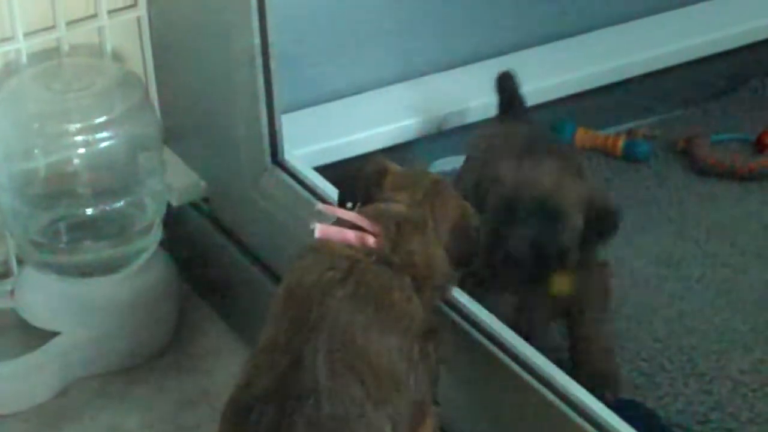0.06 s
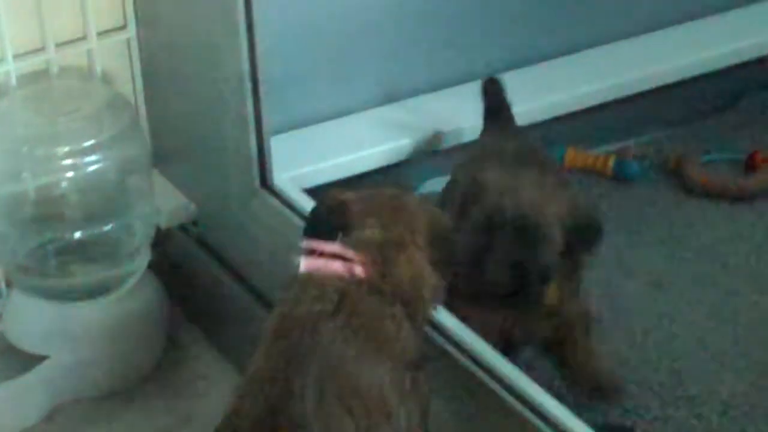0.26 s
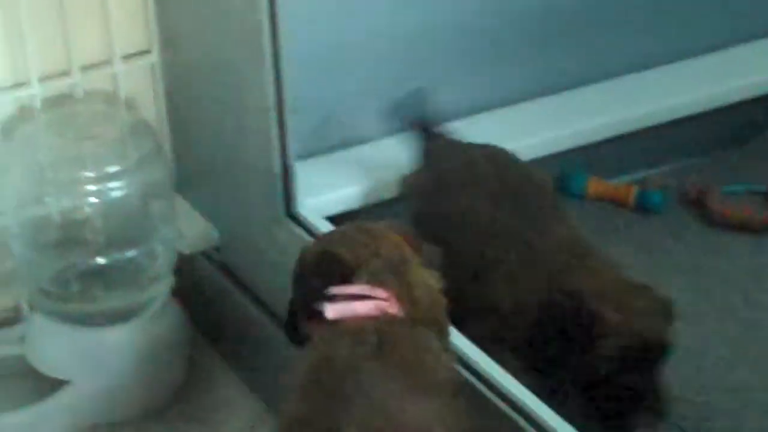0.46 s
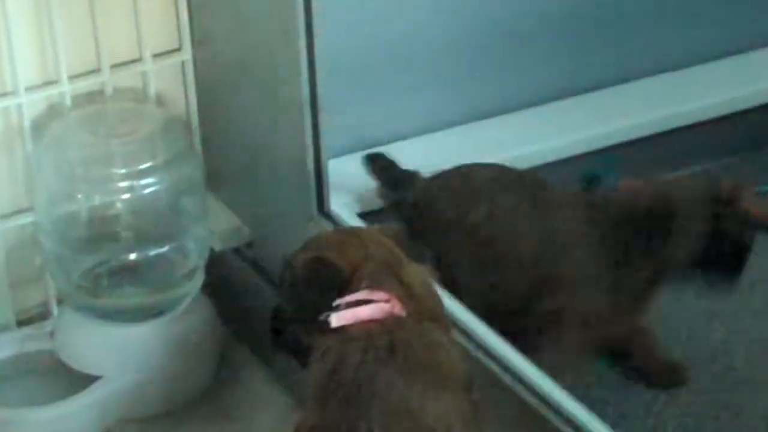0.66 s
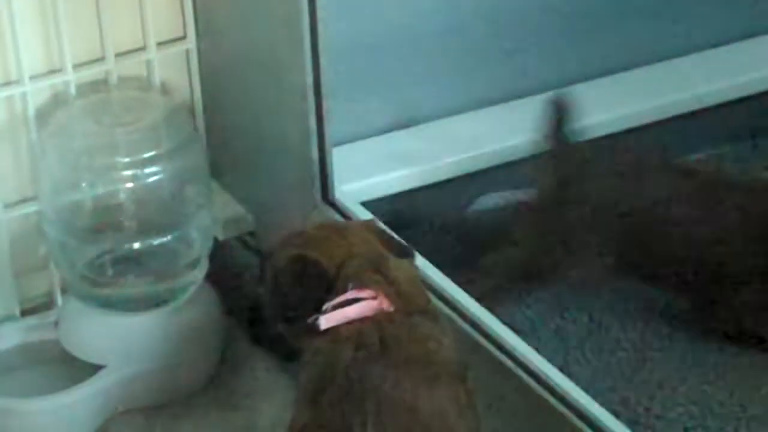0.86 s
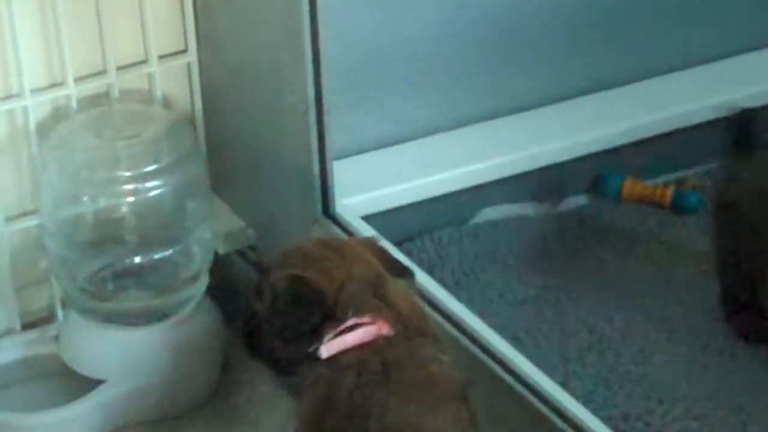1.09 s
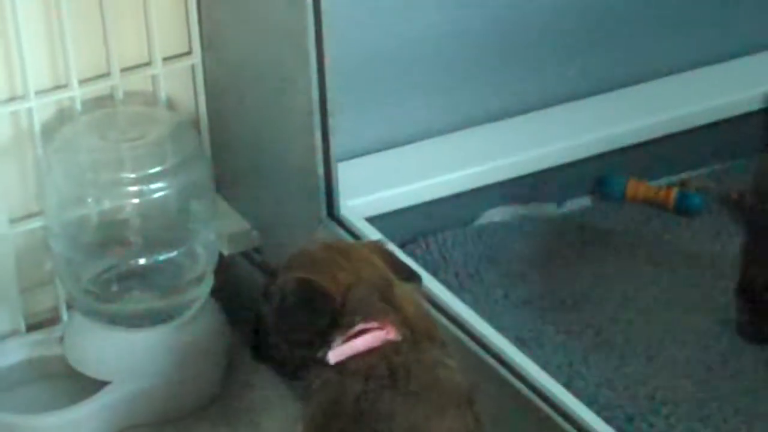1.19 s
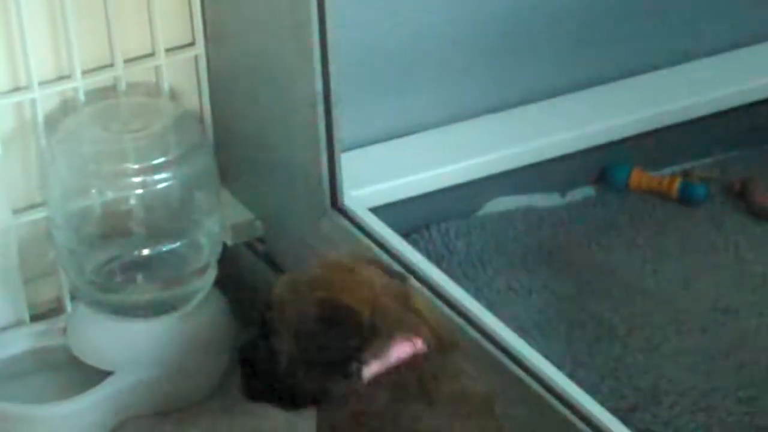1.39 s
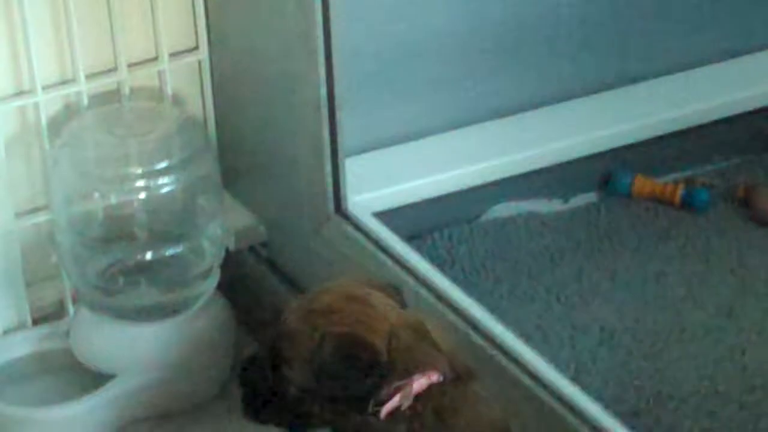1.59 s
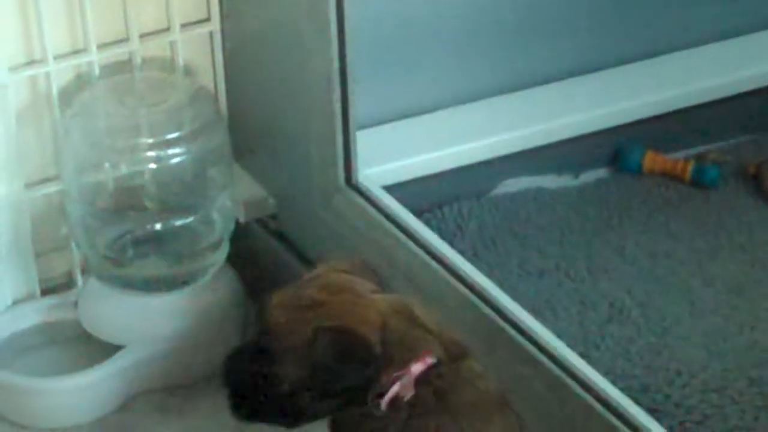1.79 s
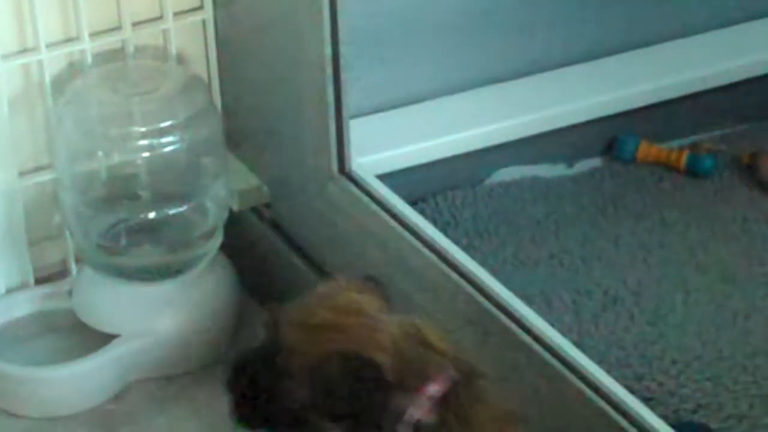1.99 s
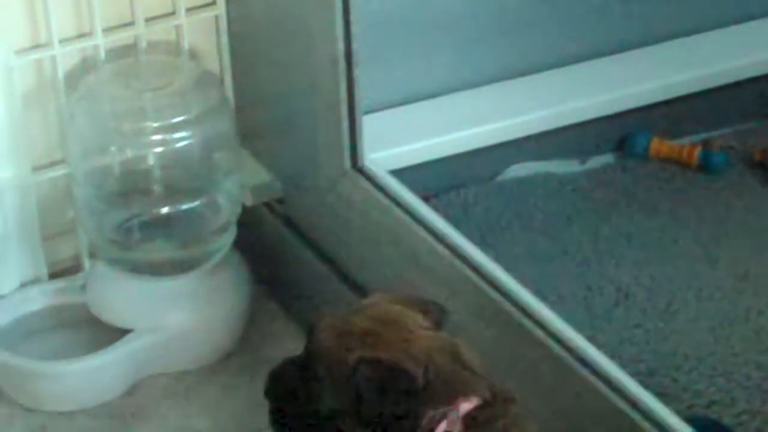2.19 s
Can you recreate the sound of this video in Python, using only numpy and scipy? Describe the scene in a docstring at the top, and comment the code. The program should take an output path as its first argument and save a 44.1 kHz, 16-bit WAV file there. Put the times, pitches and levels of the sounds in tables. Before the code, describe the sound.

Puppy claws click and scrabble quickly on a hard floor, then thin out to faint knocks

```python
"""Two puppies scamper in a pen on a hard floor in a small, live room; two microphones ring in the treble.
At first claws tick and scrape (impulsive and stick-slip noise), pads thud and hollow bumps ring (modes).
The steps then thin out; a faint tinkle of metal, one narrow mode a time, sounds from 1.6 s.
Near 2 s come dry little knocks, each a damped sine. Throughout, a pen wall echoes, the room reverberates
as decaying diffuse noise, and a steady bed of room air and microphone hiss lies beneath."""
import sys
import numpy as np
from scipy import signal
from scipy.fft import rfft, irfft
from scipy.io import wavfile
from scipy.ndimage import uniform_filter1d

SR = 44100
rng = np.random.default_rng(int(sys.argv[2]) if len(sys.argv) > 2 else 0)


def dump(signal):
    """Clip the signal to [-1, 1] and save it as 16-bit WAV at the path in sys.argv[1]."""
    limited = np.clip(np.atleast_2d(signal).T, -1, 1)
    pcm = np.round(limited * 32767).astype(np.int16)
    wavfile.write(sys.argv[1], SR, pcm)


N = 99225
T = np.arange(N) / SR
HZ = np.maximum(np.arange(N + 1) * SR / (2 * N), 1)  # bins of a spectrum padded to 2 N samples
TAIL_S = 0.6
TAIL = int(TAIL_S * SR)
TAIL_HZ = np.maximum(np.fft.rfftfreq(TAIL, 1 / SR), 1)
SPEED_OF_SOUND = 343  # m/s


def undb(db):
    """Level as the logarithm of amplitude: decibels to gain."""
    return 10 ** (np.asarray(db) / 20)


def curve(points, at=HZ):
    """Interpolation: values joined by straight lines over log frequency."""
    hz, value = np.array(points, float).T
    return np.interp(np.log(at), np.log(hz), value)


def colour(x, db):
    """Minimum phase: folding the cepstrum makes a causal filter with the given gain at each frequency."""
    cepstrum = irfft(np.log(undb(db)))
    cepstrum[1:N] *= 2
    cepstrum[N + 1:] = 0
    response = np.exp(rfft(cepstrum))
    return irfft(rfft(x, 2 * N) * response)[..., :N]


def share(power):
    """Normalization: a power spectrum scaled to a mean of one."""
    return power / np.mean(power)


def body(x, points):
    """Source and filter: a spectrum colours a force; its mean power gain is one."""
    db = curve(points)
    return colour(x, db - 10 * np.log10(np.mean(undb(db) ** 2)))


def contact(start, rise, fade, t=T):
    """Impact with damping: a quick rise, then an exponential fade (time constants in s)."""
    age = np.maximum(t - start, 0)
    return (1 - np.exp(-age / rise)) * np.exp(-np.minimum(age / fade, 50))


def chatter():
    """White excitation: tiny slips of even strength and random sign."""
    return np.sign(rng.standard_normal(N))


def ring(hz, width_hz, size):
    """Phase diffusion: a sine of unit power whose wandering phase widens its spectral line."""
    wander = uniform_filter1d(rng.standard_normal(size), size=8) * np.sqrt(2 * np.pi * width_hz / SR)
    phase = np.cumsum(2 * np.pi * hz / SR + wander)
    return np.sqrt(2) * np.sin(phase)


def delayed(x, seconds):
    """Propagation delay: a phase that falls linearly with frequency."""
    return irfft(rfft(x, 2 * N) * np.exp(-2j * np.pi * HZ * seconds))[:N]


PORT_GAP_M = 0.042  # between the two microphone ports


def diffuse(size):
    """Diffuse-field coherence: noise spectra at two points, alike in the bass, unrelated in the treble."""
    a, b = rfft(rng.standard_normal((2, size)))
    alike = np.sinc(2 * np.fft.rfftfreq(size, 1 / SR) * PORT_GAP_M / SPEED_OF_SOUND)
    return np.array([a, alike * a + np.sqrt(1 - alike ** 2) * b])


# spectrum of the room's still air: f/Hz, relative spectral density/dB
AIR_SPECTRUM = [(25, -20.5), (60, -11), (110, -1.5), (250, -1.5), (600, -9.5), (1500, -14.5), (3000, -15.5),
                (4500, -24), (7500, -11.5), (10000, -46)]
AIR_DB = -65.5


def still_air():
    """Diffuse background: steady coloured noise from all sides."""
    return undb(AIR_DB) * body(irfft(diffuse(N), N), AIR_SPECTRUM)


# decay of the room, by band: f/Hz, reverberation time/s
ROOM_DECAY = [(150, 0.61), (400, 0.85), (1000, 0.34), (3000, 0.34), (7000, 0.28), (14000, 0.37)]
# gain kept on reflection: f/Hz, gain/dB
WALL_GAIN = [(3000, 3), (7000, 3.5), (10000, 2), (14000, -2.5)]
ROOM_DB, EARLY_DB = -0.5, -8.5
ROOM_BUILD_S, EARLY_FADE_S = 0.0047, 0.015


def room_bands():
    """Frequency-dependent absorption: each band's weight over frequency, and its early and late envelope."""
    t = T[:TAIL]

    def unit(v):
        """Unit energy: a vector divided by its norm."""
        return v / np.linalg.norm(v)

    early = undb(EARLY_DB) * unit(contact(0, ROOM_BUILD_S, EARLY_FADE_S, t))
    bands, fades = [], []
    for own in ROOM_DECAY:
        t60 = own[1]
        late = undb(ROOM_DB) * unit(contact(0, ROOM_BUILD_S, t60 / np.log(1000), t))
        fades.append(np.hypot(early, late))
        bands.append(curve([(row[0], row is own) for row in ROOM_DECAY], TAIL_HZ))
    return np.array(bands) * undb(curve(WALL_GAIN, TAIL_HZ)), np.array(fades)


def reflections(gain, bands, fades):
    """Statistical reverberation: decaying diffuse noise answers an impulse, in a new random pattern each time."""
    noise = diffuse(TAIL) * gain
    return (irfft(noise[:, None] * bands, TAIL) * fades).sum(axis=1)


STEP_S = 0.1  # a new pattern of reflections this often


def room(x):
    """Convolution with the room's impulse response: reverberation of all sounds but the ticks."""
    step, space = int(STEP_S * SR), room_bands()
    out = np.zeros((2, N + TAIL))
    for i in range(0, N, step):
        wet = signal.fftconvolve(reflections(0.97, *space), x[None, i:i + step], axes=1)
        out[:, i:i + wet.shape[1]] += wet
    return out[:, :N]


# metal touches: t/s, f/Hz, level/dB
METAL_TINKLES = [(1.575, 7170, -59), (1.817, 7260, -55.5), (1.975, 7070, -58), (2.18, 9800, -55.5)]
TINKLE_RISE_S, TINKLE_FADE_S, TINKLE_WIDTH_HZ = 0.00042, 0.033, 25.3


def tinkles():
    """Modal ringing: lightly touched metal sounds on one high mode."""
    out = np.zeros(N)
    for start, hz, db in METAL_TINKLES:
        touch = undb(db) * contact(start, TINKLE_RISE_S, TINKLE_FADE_S)
        out += touch * ring(hz, TINKLE_WIDTH_HZ, size=N)
    return out


PAW_RISE_S = 0.0034  # of soft contacts
# hollow bumps against the floor and the pen: t/s, f/Hz, level/dB
HOLLOW_BUMPS = [(.003, 146.5, -53.5), (.235, 148.6, -53), (0.389, 135, -51), (.535, 154.3, -40),
                (.72, 155.1, -40), (0.846, 147.6, -47), (1.008, 161, -44), (1.257, 101.7, -54),
                (1.326, 85.3, -64), (1.601, 88, -58.5), (1.747, 490, -53.5), (2.04, 295.3, -51)]
BUMP_CYCLES, BUMP_WIDTH_SHARE = 7.6, 0.17  # fade in cycles, line width as a share of the pitch


def bumps():
    """Damped resonance: a soft bump rings hollow for a few cycles."""
    out = np.zeros(N)
    for start, hz, db in HOLLOW_BUMPS:
        hit = undb(db) * contact(start, PAW_RISE_S, BUMP_CYCLES / hz)
        out += hit * ring(hz, BUMP_WIDTH_SHARE * hz, size=N)
    return out


TICK_RISE_S = 0.0003  # of hard contacts
# dry knocks as a puppy fumbles about: t/s, f/Hz, level/dB
DRY_TAPS = [(1.9575, 646, -42), (1.976, 620, -36.5), (2.035, 1050, -46), (2.0425, 487, -51),
            (2.049, 433, -35), (2.057, 405, -42), (2.067, 750, -47), (2.084, 486, -51), (2.129, 1050, -43),
            (2.1435, 845, -38.5), (2.1468, 1000, -38.5)]
TAP_CYCLES = 0.7  # fade in cycles


def taps():
    """Heavy damping: a light, dry knock dies within a cycle or two."""
    out = np.zeros(N)
    for start, hz, db in DRY_TAPS:
        hit = undb(db) * contact(start, TICK_RISE_S, TAP_CYCLES / hz)
        out += hit * np.sin(2 * np.pi * hz * (T - start))
    return out


# paw pads landing: t/s, pat level/dB, floor boom level/dB
PAW_LANDINGS = [(0.014, -51, -54), (.135, -48.5, -45), (0.223, -43.5, -50.5), (0.432, -44, -44.5),
                (.512, -40, -63), (0.539, -30.5, -71.5), (0.603, -37, -44.5), (0.641, -42.5, -48),
                (0.712, -35, -44.5), (0.764, -40.5, -39.5), (0.849, -53, -46), (0.944, -33, -52),
                (.97, -41, -49), (1.007, -36.5, -40), (1.087, -41, -48), (1.114, -46, -43),
                (1.2, -51.5, -58), (1.336, -55.5, -67.5), (1.626, -56.5, -60.5), (2.035, -48, -79)]
# spectrum of a pad's pat: f/Hz, relative spectral density/dB
PAT_SPECTRUM = [(60, -22), (150, -18.5), (300, 4.5), (500, -1), (800, 3), (1300, -14.5), (2500, -25.5),
                (6000, -42.5)]
# spectrum of the floor's boom: f/Hz, relative spectral density/dB
BOOM_SPECTRUM = [(25, -18.5), (55, -36), (80, -16.5), (110, -7), (150, -4), (190, -5), (260, -9),
                 (600, -31.5)]
PAT_FADE_S, BOOM_FADE_S = 0.0087, 0.015


def paws():
    """Soft impact: slow contact by pads gives a dull pat, and the floor booms under them."""
    pat, boom = np.zeros((2, N))
    for start, pat_db, boom_db in PAW_LANDINGS:
        pat += undb(pat_db) * contact(start, PAW_RISE_S, PAT_FADE_S)
        boom += undb(boom_db) * contact(start, PAW_RISE_S, BOOM_FADE_S)
    return body(pat * chatter(), PAT_SPECTRUM) + body(boom * chatter(), BOOM_SPECTRUM)


# claws dragging: t/s, length/s, level/dB, floor knock re scrape/dB
CLAW_SCRAPES = [(-.02, 0.029, -35.5, -8), (0.217, 0.031, -38, -13), (0.312, 0.029, -27, -19.5),
                (0.34, 0.048, -39.5, -8), (0.446, 0.032, -41, -8), (0.575, 0.098, -49.5, 3.5),
                (0.719, 0.055, -31.5, -4.5), (0.87, 0.092, -44, -26), (0.959, 0.025, -38, -7),
                (1.086, 0.034, -29, -9.5), (1.204, 0.055, -50, -5), (1.485, 0.04, -50, -11),
                (1.917, 0.038, -58, -23), (2.021, 0.021, -50.5, -23), (2.115, 0.027, -56, -11),
                (2.161, 0.018, -53, -11)]
# spectrum of a dragged claw: f/Hz, relative spectral density/dB
DRAG_SPECTRUM = [(500, -49), (1500, -21), (2800, -2), (4700, -6), (5900, -0.5), (7300, 3.5), (9300, -8),
                 (14500, -20)]
# spectrum of the floor's knock, under scrapes and ticks: f/Hz, relative spectral density/dB
KNOCK_SPECTRUM = [(100, -17), (400, 1.5), (800, 2.5), (1400, 1), (2100, 4.5), (2800, -4), (4000, 2),
                  (8000, -20.5)]
GRAINS_PER_S, GRAIN_SPREAD_DB = 1100, 4.5
SCRAPE_EVEN_S = 0.012  # grain power is evened out over this time


def scrapes():
    """Stick-slip friction: a dense run of uneven grains under a pressure that swells and eases."""
    tip, knock = np.zeros((2, N))
    for start, length, db, knock_db in CLAW_SCRAPES:
        along = np.clip((T - start) / length, 0, 1)
        push = undb(db) * np.sqrt(np.abs(np.sin(np.pi * along)))
        tip += push
        knock += push * undb(knock_db)
    slips = rng.random(N) < GRAINS_PER_S / SR
    grains = slips * chatter() * undb(GRAIN_SPREAD_DB * rng.standard_normal(N))
    grains /= np.sqrt(uniform_filter1d(grains ** 2, size=int(SCRAPE_EVEN_S * SR)) + 1e-9)
    return body(tip * grains, DRAG_SPECTRUM) + body(knock * grains, KNOCK_SPECTRUM)


EVEN_S = 0.0035  # slip power is evened out over this time


def grit(points):
    """Constant short-time power: coloured random slips at an even strength."""
    x = body(chatter(), points)
    return x / np.sqrt(uniform_filter1d(x ** 2, size=int(EVEN_S * SR)) + 1e-12)


# claw ticks: t/s, level/dB, floor knock re tick/dB, fade time/s, room send/dB, ring f/Hz, ring re tick/dB
CLAW_TICKS = [(.007, -30, -5, 0.0013, 3.5, 4530, 0), (0.0172, -28.5, 1.5, 0.0015, -1.5, 4150, -21),
              (0.087, -22, -12, 0.0037, -4, 6320, -8), (0.1338, -28.5, -10.5, 0.0017, -5, 7430, 4.5),
              (.187, -31, -8.5, 0.0027, 3.5, 7450, -14), (0.204, -27, -11, 0.0028, -3.5, 7100, -11),
              (0.22, -27, -11, 0.004, 4.5, 6900, -5), (.229, -31.5, -0.5, 0.0021, -1.5, 4340, -15),
              (0.3012, -21.5, -14, 0.0027, -1, 4410, -1), (0.3238, -21, -17, 0.003, -5, 7000, -16),
              (0.3382, -14.5, -30, 0.0026, -10.5, 6200, -5), (.426, -32, -11.5, 0.0079, -0.5, 7350, -5),
              (0.4334, -24.5, -10.5, 0.0047, -13, 4610, -11), (0.448, -27, -11.5, 0.003, -0.5, 6860, -13.5),
              (0.4859, -31, -7.5, 0.0092, -3, 7170, 3), (0.5075, -15.5, -7, 0.0014, 3.5, 7670, 0.5),
              (0.5115, -10, -22, 0.0023, -4, 6730, 2.5), (0.5118, -16, -23, 0.0019, -8.5, 4505, 9.5),
              (0.6081, -26, -14, 0.0021, -7.5, 7480, 7), (0.636, -29, -6, 0.0016, 1.5, 3820, 1),
              (0.672, -29.5, -13, 0.0023, 3, 4360, 0.5), (0.697, -29, -7, 0.0047, 0, 5700, -32),
              (0.7099, -13, -10, 0.0022, -0.5, 8140, 1), (0.712, -10.5, -10.5, 0.004, -12.5, 4860, -27),
              (0.852, -25.5, -9.5, 0.0041, -5.5, 4520, -10), (.902, -30.5, -38, 0.0026, -6, 7300, 5.5),
              (.937, -22.5, -8, 0.0034, -4, 7620, -0.5), (0.9516, -18, -16.5, 0.0032, -4, 7430, -12.5),
              (0.9867, -12, -30.5, 0.0028, -9, 7230, 0.5), (1.0014, -18.5, -25, 0.0015, -3.5, 5370, 4),
              (1.079, -21.5, -9.5, 0.0063, -5, 4510, -6.5),
              (1.092, -19.5, -34.5, 0.0049, -37.5, 7950, -29.5), (1.128, -27.5, -13, 0.0027, -6, 7300, 6),
              (1.1993, -27.5, -10.5, 0.0035, -3.5, 4560, -8.5), (1.256, -37, -8.5, 0.00071, -1, 7550, 11.5),
              (1.337, -33, -6.5, 0.0021, -5.5, 4430, -2), (1.428, -42.5, -13, 0.0018, -2.5, 7040, 2),
              (1.4424, -39.5, -14, 0.0033, -6, 7300, 0.5), (1.6315, -41, -5.5, 0.0019, -5.5, 4170, -1),
              (1.764, -54, -4, 0.0026, -13, 4000, 1), (2.0194, -37.5, -9, 0.0024, -5, 7470, 1.5),
              (2.0273, -45, -13, 0.0019, -6, 6160, 9.5)]
# spectrum of a claw tip: f/Hz, relative spectral density/dB
CLAW_SPECTRUM = [(500, -23.5), (1500, -25), (2700, -3.5), (3700, -6.5), (4550, -1), (5300, -1.5),
                 (6300, -3.5), (7600, 4), (9300, -6.5), (11500, -12.5), (14500, -17)]
RING_WIDTH_HZ, TAIL_RING_WIDTH_HZ = 460, 1800  # of a claw's ring, direct and in the room's tail
TICK_RING_ROOM_DB = -3.5  # ring in the tail, re its direct level


def ticks():
    """Hard impact: a claw chatters and rings for milliseconds; returns direct sound and reverberation."""
    tip, knock, rings = np.zeros((3, N))
    wet, space = np.zeros((2, N + TAIL)), room_bands()
    claw_power = share(undb(curve(CLAW_SPECTRUM, TAIL_HZ)) ** 2)
    knock_power = share(undb(curve(KNOCK_SPECTRUM, TAIL_HZ)) ** 2)
    for start, db, knock_db, fade, room_db, hz, ring_db in CLAW_TICKS:
        first = max(int(start * SR), 0)
        span = slice(first, first + SR // 20)
        push = undb(db) * contact(start, TICK_RISE_S, fade, T[span])
        # overlapping noises add in power
        tip[span] += push ** 2
        knock[span] += (push * undb(knock_db)) ** 2
        rings[span] += push * undb(ring_db) * ring(hz, RING_WIDTH_HZ, size=len(push))
        # the room gathers the tick from all directions, so its tail has the tick's smooth overall colour
        ring_power = share(1 / (1 + (2 * (TAIL_HZ - hz) / TAIL_RING_WIDTH_HZ) ** 2) ** 2)
        power = claw_power + undb(knock_db) ** 2 * knock_power
        power += undb(ring_db + TICK_RING_ROOM_DB) ** 2 * ring_power
        send = undb(room_db) * np.linalg.norm(push)
        wet[:, first:first + TAIL] += send * reflections(np.sqrt(power), *space)
    direct = np.sqrt(tip) * grit(CLAW_SPECTRUM) + np.sqrt(knock) * grit(KNOCK_SPECTRUM) + rings
    return direct, wet[:, :N]


PORT_LAG_S, DIRECT_RIGHT_DB = 0.000066, -2  # right port re left
ECHO_S, ECHO_DB = 0.0128, -15  # off the wall of the pen
SCRAPE_ROOM_DB, PAW_ROOM_DB, TAP_ROOM_DB, RING_ROOM_DB = -6, 1, -7, -18  # sends to the room


def scene():
    """Superposition: the puppies a little to the left, a wall echo, the room and its still air."""
    clicks, click_tails = ticks()
    drag, pads, knocks = scrapes(), paws(), taps()
    ringing = tinkles() + bumps()
    direct = clicks + drag + pads + knocks + ringing
    feed = undb(SCRAPE_ROOM_DB) * drag + undb(PAW_ROOM_DB) * pads
    feed += undb(TAP_ROOM_DB) * knocks + undb(RING_ROOM_DB) * ringing
    near = np.array([direct, undb(DIRECT_RIGHT_DB) * delayed(direct, PORT_LAG_S)])
    echo = undb(ECHO_DB) * delayed(direct, ECHO_S)
    return near + echo + click_tails + room(feed) + still_air()


# resonances of the microphone ports: f/Hz, width/Hz, boost/dB
PORT_RESONANCES = [(4503, 1016, 8), (7490, 980, 3.5)]
# response of the right microphone: f/Hz, level re left/dB
RIGHT_RESPONSE = [(100, -2), (1200, -2), (4200, -2.5), (6200, 3), (7000, -11.5), (8000, -13.5),
                  (10000, -15.5), (14000, -8)]
# hiss of each microphone: f/Hz, relative spectral density/dB
HISS_SPECTRUM = [(25, 5), (60, 15.5), (200, 12.5), (1500, 3), (8000, -5), (14000, -5.5)]
HISS_DB, TOP_HZ = -68, 14100


def record(dry):
    """Port resonance: both ports ring, the right is duller, both hiss; peaks clip and the top is cut."""
    rings = sum(db / (1 + (2 * (HZ - hz) / width) ** 2) for hz, width, db in PORT_RESONANCES)
    heard = np.array([colour(dry[0], rings), colour(dry[1], rings + curve(RIGHT_RESPONSE))])
    heard = heard + undb(HISS_DB) * body(rng.standard_normal((2, N)), HISS_SPECTRUM)
    top_cut = signal.ellip(8, 0.2, 70, TOP_HZ, fs=SR, output="sos")
    return signal.sosfilt(top_cut, np.clip(heard, -1, 1))


dry = scene()
out = record(dry)
dump(out)
```